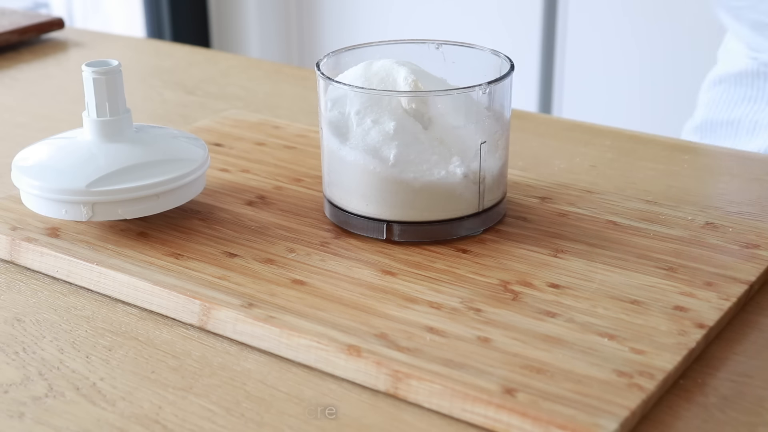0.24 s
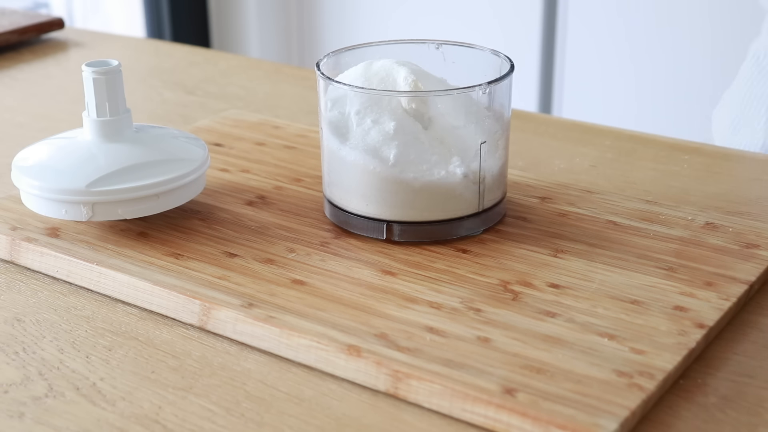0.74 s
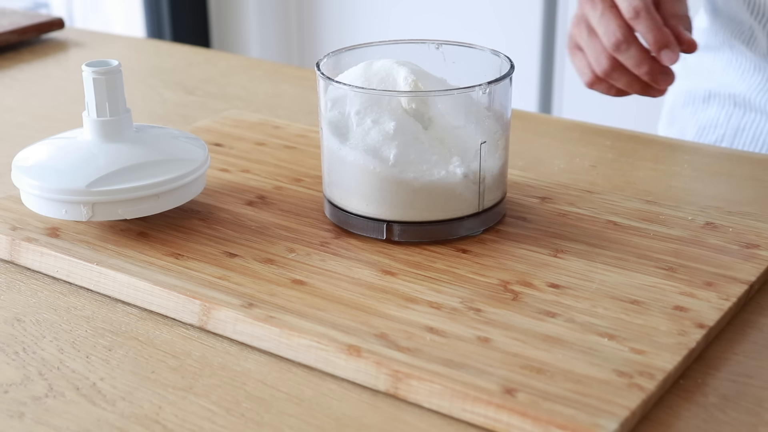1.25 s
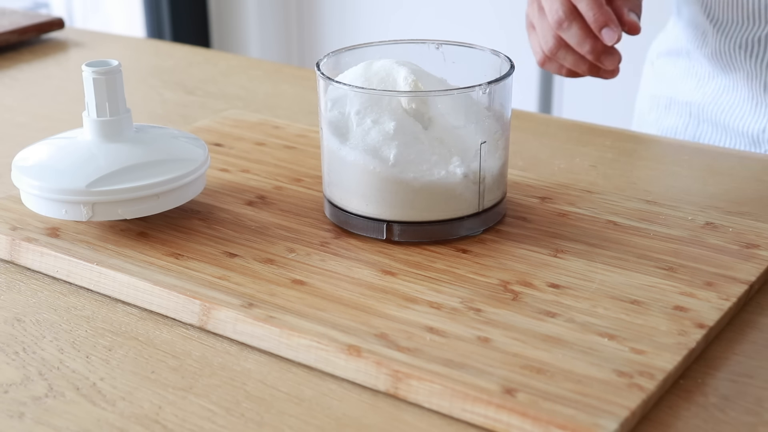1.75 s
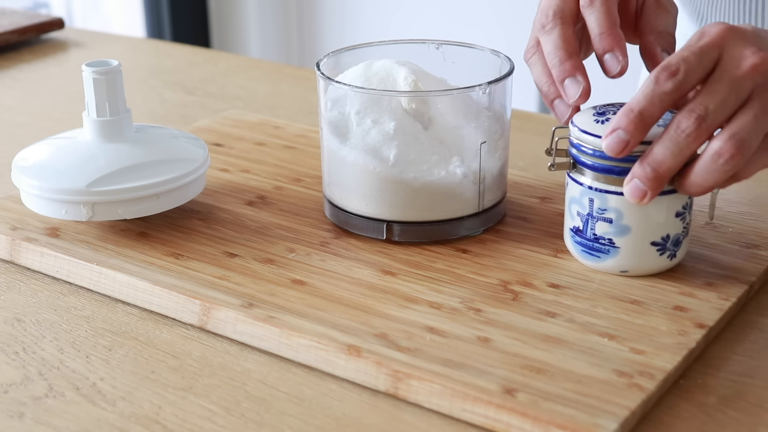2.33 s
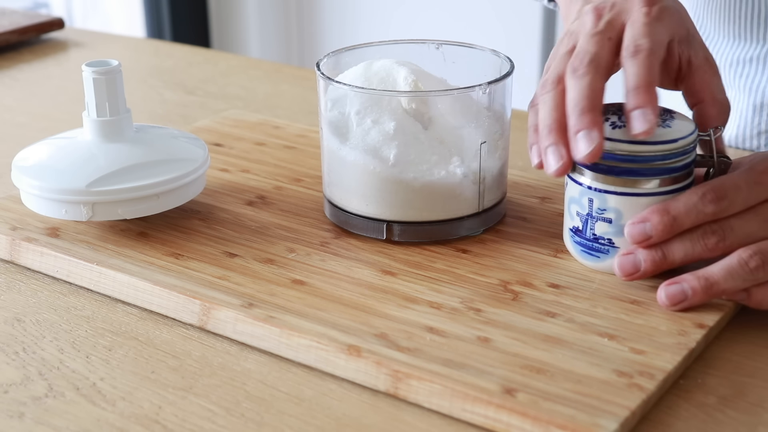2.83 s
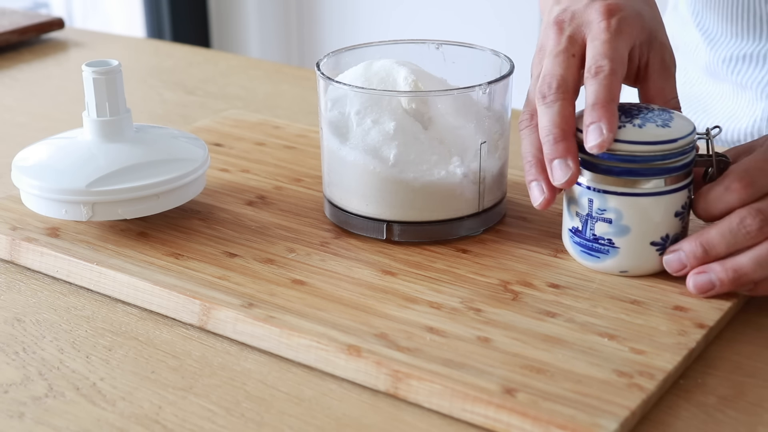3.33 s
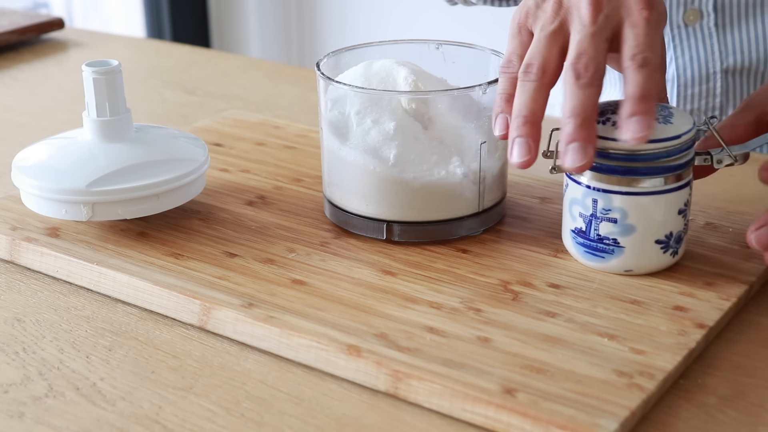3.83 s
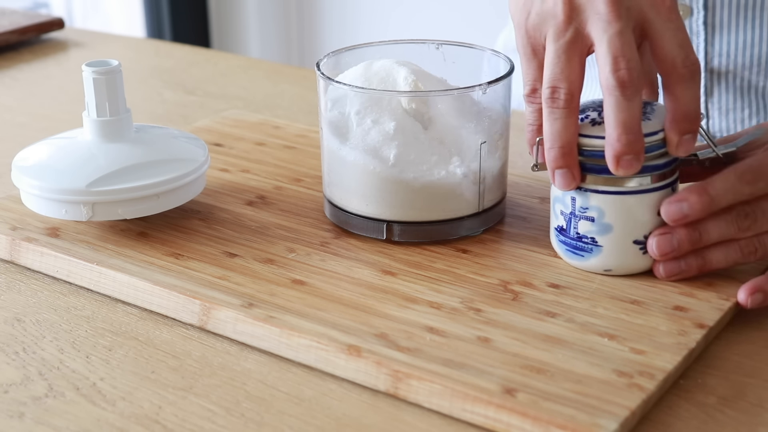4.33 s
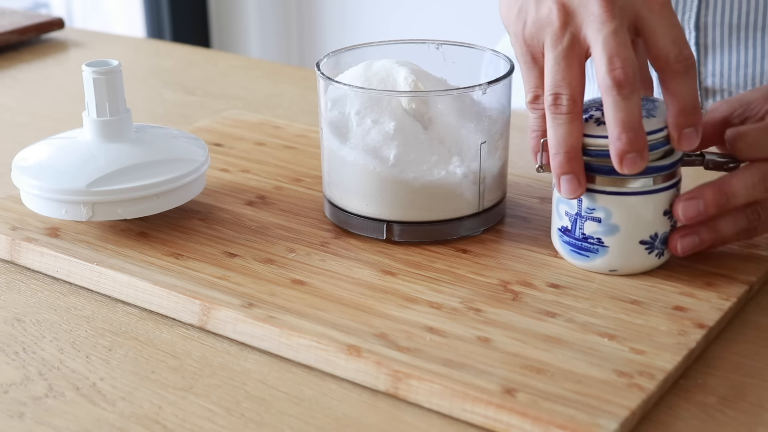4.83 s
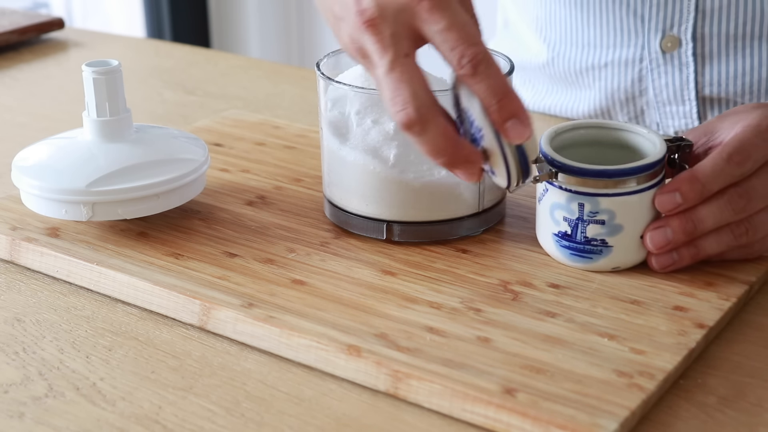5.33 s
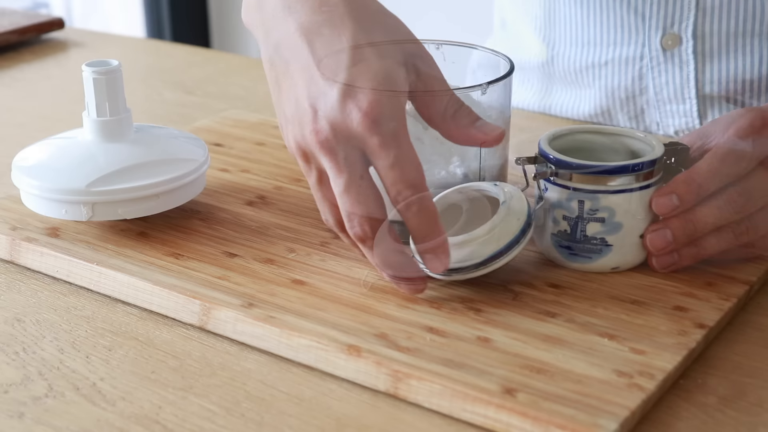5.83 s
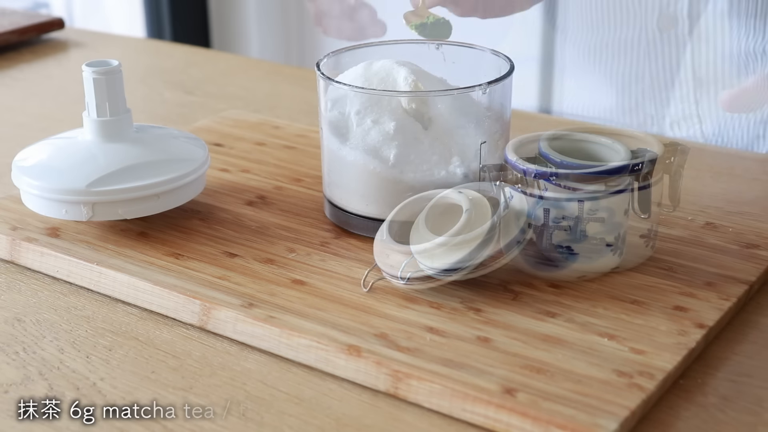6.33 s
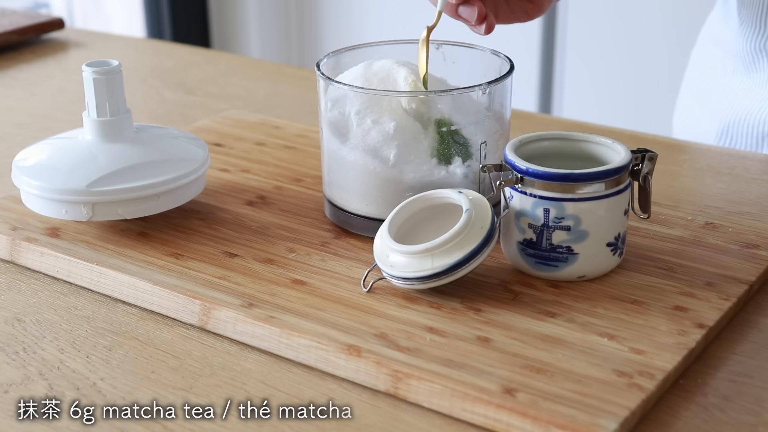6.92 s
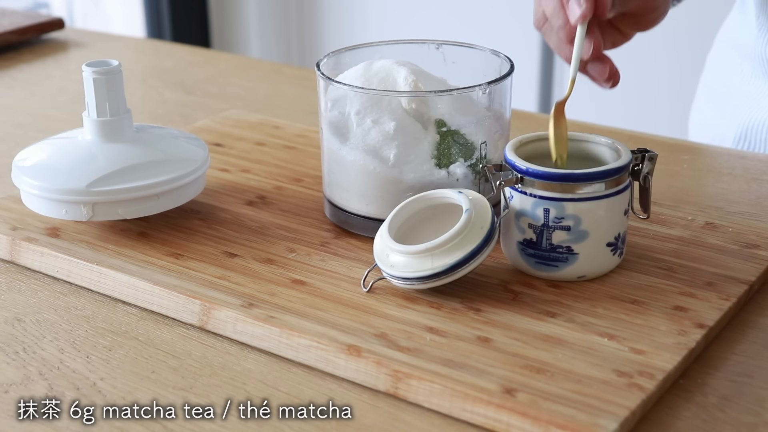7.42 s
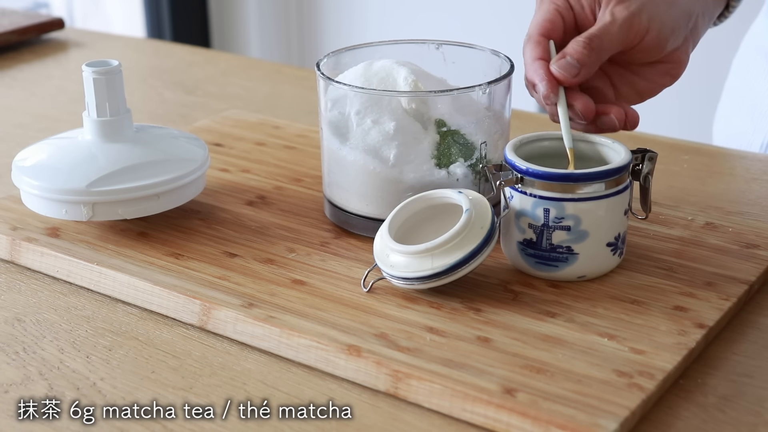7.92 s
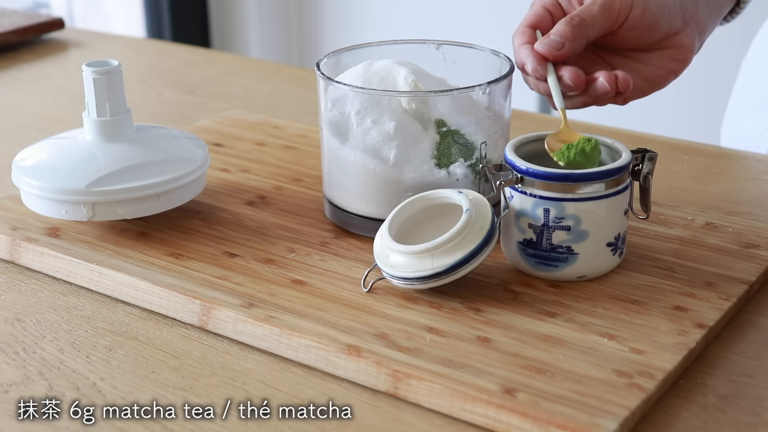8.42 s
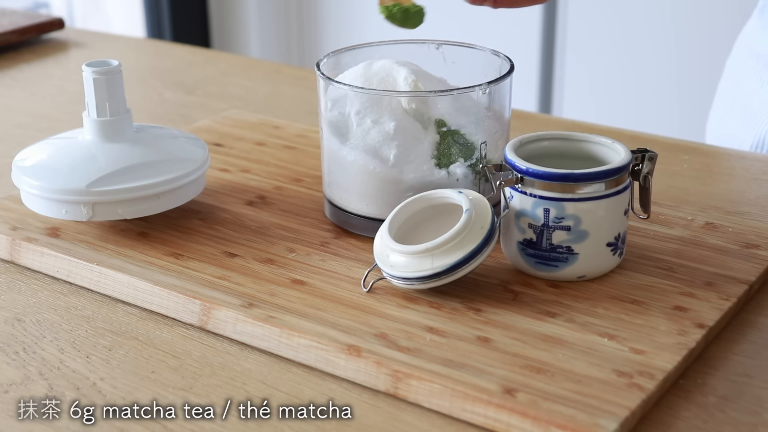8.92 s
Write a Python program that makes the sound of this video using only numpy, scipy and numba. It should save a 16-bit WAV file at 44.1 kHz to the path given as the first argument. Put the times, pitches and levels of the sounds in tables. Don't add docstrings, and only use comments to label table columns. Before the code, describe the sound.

Low house hum and soft hiss underlie kitchen handling heard close up. Two very loud, short wooden slams echo briefly, with gentle settling thumps around them. A ceramic jar's wire clasp clicks and jingles, its lid rattles open with a high bright ring, and more knocks land on the board. After a calm gap of birdsong, a spoon touches, scrapes briefly and taps the jar twice.

```python
import sys
import numpy as np
from scipy import signal
from scipy.fft import rfft, irfft
from scipy.io import wavfile
from scipy.ndimage import uniform_filter1d
from numba import njit

SR = 44100
rng = np.random.default_rng(int(sys.argv[2]) if len(sys.argv) > 2 else 0)


def invert_db(level):
    return 10 ** (np.asarray(level, dtype=float) / 20)


def materialize(psi):
    bounded = np.clip(np.atleast_2d(psi).T, -1, 1)
    quanta = np.round(bounded * 32767).astype(np.int16)
    wavfile.write(sys.argv[1], SR, quanta)


N = 403956

# pitch_hz, level_db (per Hz)
HUM = [(20, -11), (42, -5.5), (65, -7), (96, -12), (134, -2.5), (182, -14.5), (290, -14.5), (420, -18.5),
       (870, -21), (1660, -25), (2500, -27), (6000, -31.5), (11000, -37), (16000, -42.5)]
# pitch_hz, side_minus_mid_db
HUM_SIDE = [(60, -12), (110, -14), (200, -5.5), (380, -2), (700, -1), (1290, -0.5), (2380, -1.5), (4400, 0),
            (8120, -0.5), (15000, -1)]
HUM_DB = -51.5
# pitch_hz, fade_by_60_db_s, level_db
ROOM = [(99.5, 0.36, -3), (205, 0.62, -10), (400, 0.57, -13.5), (913, 0.47, -10.5), (1500, 0.47, -10),
        (2990, 0.39, -12), (5100, 0.47, -18.5), (10500, 0.082, -5.5), (15270, 0.09, -38)]
SLAM_HOLD_S = 0.065

# time_s, pitch_hz, level_db
SLUR = [(6.555, 1720, -60), (6.577, 1820, -45.5), (6.635, 1723, -47), (6.661, 2118, -44.5),
        (6.681, 2162, -39.5), (6.731, 1980, -45), (6.771, 1910, -44), (6.78, 2170, -62)]
# start_s, length_s, first_pitch_hz, last_pitch_hz, peak_db
CLEAR_NOTES = [(1.78, .075, 1895, 1865, -53), (1.9, .1, 1880, 1880, -56), (2.005, .055, 1860, 1830, -45),
               (2.065, .08, 1880, 1850, -53), (2.215, .03, 1800, 2150, -58), (7.35, .135, 1860, 1480, -48)]
STEADY_NOTES = [(7.575, .21, 2810, 2740, -51), (7.8, .09, 2780, 2750, -58), (3.095, .05, 4330, 4390, -59),
                (3.15, .12, 4390, 4390, -65), (3.41, .135, 4300, 4230, -62), (3.515, .06, 6380, 6440, -57),
                (3.58, .11, 6400, 6380, -64)]
CHIRPS = [(2.55, .035, 3250, 2950, -52), (2.56, .03, 2150, 1950, -51), (2.67, .04, 3050, 2850, -52),
          (2.68, .03, 2100, 1750, -54), (2.94, .05, 3300, 3350, -62), (6.94, .055, 2820, 2850, -51),
          (6.78, .14, 1980, 2100, -60), (6.9, .11, 2150, 2450, -55), (6.99, .22, 2450, 2480, -53),
          (7.27, .1, 1520, 1800, -54), (6.89, .12, 3100, 2700, -60), (7.48, .05, 1520, 1560, -58),
          (8.49, .1, 6250, 6750, -63), (8.55, .17, 4500, 4900, -63)]
# start_s, length_s, top_pitch_hz, peak_db, pulses_per_s
TRILLS = [(1.862, .14, 1930, -47, 29), (6.32, .182, 2120, -49, 38.5), (7.27, .09, 2020, -53, 45),
          (2.965, .12, 6550, -56, 62), (3.25, .125, 6500, -55, 62)]
# start_s, length_s, first_pitch_hz, last_pitch_hz, peak_db
SCRAPES = [
    (7.846, .016, 1150, 1150, -40),
    (7.87, .1, 1150, 950, -50),
    (7.885, .075, 3150, 2950, -51),
]
FLICK, TRILL_HUSK_HZ = .11, 25
CHIRP_HUSK, STEADY_HUSK_HZ = .19, 70
SWELL, START_DB, END_DB = .55, -11, -7
CLEAR_DB, STEADY_DB, CHIRP_DB, TRILL_DB, SCRAPE_DB = 1, -.5, -.5, 0.5, -5.5

# peak_s, half_length_s, level_db, brightness_hz
STROKES = [(.005, 0.38, -46, 940), (1.177, 0.77, -52.5, 1160), (1.542, 0.057, -49, 710),
           (3.317, 0.076, -55, 2180), (3.645, 0.95, -48, 1390), (4.08, 0.18, -46, 1570),
           (4.45, 0.9, -62, 1320), (4.715, 0.092, -54, 1500), (4.994, 0.34, -46.5, 1580),
           (7.901, 0.04, -41, 1100)]
STROKE_FADE_DB = -16

# start_s, level_db
BOOMS = [
    (2.245, -26.5),
    (5.479, -33),
    (5.867, -35),
    (7.847, -40.5),
    (8.156, -31.5),
    (8.316, -35.5),
]
# start_s, peak_db, crack_centre_hz, bright_edge_db
SETTLES = [(.535, -30, 890, -75), (.895, -42, 1210, -59), (1.16, -37.5, 1500, -70),
           (1.465, -35.5, 480, -58), (1.535, -36, 950, -29), (2.359, -31.5, 400, -60),
           (3.415, -31.5, 704, -58), (5.215, -29.5, 656, -74)]
# start_s, peak_db, crack_centre_hz, bright_edge_db
KNOCKS = [(3.694, -15, 584, -10.5), (4.297, -27.5, 760, -15), (4.695, -37, 620, -39),
          (3.698, -26, 1500, -44), (4.883, -35.5, 785, -17.5), (5.48, -14, 895, -70),
          (5.69, -41.5, 920, -31.5), (5.869, -20.5, 830, -6.5), (7.849, -31, 1030, -67),
          (8.16, -25.5, 1000, -12), (8.316, -31, 1040, -15)]
# start_s, peak_db, crack_centre_hz, bright_edge_db
SLAMS = [
    (0.415, -0.86, 1276, -8),
    (2.248, -1.8, 1520, -19),
]
# pitch_hz, level_db, fade_by_60_db_s
THUMP = [(221.7, -8, 0.033), (268, -1.5, 0.027), (324, -2.5, 0.04), (421.6, -4.5, 0.0308), (519, -2, 0.026),
         (620, -16.5, 0.026)]
KNOCK_CONTACT_S, SLAM_CONTACT_S, SETTLE_CONTACT_S = 0.0055, 0.0025, 0.028
KNOCK_THUMP_DB, SLAM_THUMP_DB, SETTLE_THUMP_DB = -11, -21, -5
THUMP_PER_EDGE = 0.14
SLAM_THUMP_PER_EDGE = -0.24

# start_s, clatter_db, wire_ring_over_clatter_db, lid_ring_over_clatter_db
CLINKS = [(3.6945, -19, -11, -12), (3.7958, -34, -21, -1.5), (3.8373, -32, -24, -15),
          (4.0183, -38.5, -14, -6), (4.049, -41, -20, -24), (4.1224, -50, -22, -20),
          (4.2969, -19, -10, -16), (4.6594, -46.5, -1, -1), (4.6943, -35.5, -7, -0.5),
          (4.7124, -29, -1, -3), (4.7322, -22.5, -21, -5.5), (4.8856, -26, -26, -12),
          (4.921, -31.5, 9.5, -26), (4.975, -40, -9, -7), (5.1862, -29, -15, -5), (5.217, -22, 17, 3),
          (5.2243, -18.5, 14, 2)]
# start_s, clatter_db, wire_ring_over_clatter_db, lid_ring_over_clatter_db
LID_DOWN = [
    (5.868, -19, -38, -38),
    (5.885, -35, -4, -25),
]
# start_s, clatter_db, wire_ring_over_clatter_db, lid_ring_over_clatter_db
LID_SHAKE = [(5.218, -24, -44, -44)]
# start_s, clatter_db
JIGGLES = [(4.03, -50), (4.065, -60), (4.115, -47), (4.145, -52), (4.64, -52), (4.95, -47), (5.01, -56),
           (5.046, -48.5), (5.07, -59)]
# start_s, clatter_db, thin_ring_over_clatter_db, bowl_ring_over_clatter_db
TAPS = [
    (7.8484, -54, -10, -18),
    (7.8986, -59, 14.5, -7),
    (8.0614, -63, -1, 12),
    (8.1579, -24, 2, -35),
    (8.316, -25, 0.5, -20),
]
WIRE_HZ = [9954, 10100, 10720, 12180, 13460, 15010, 15210]
# level_db, fade_by_60_db_s
WIRE = [(0, .28), (-11, .08), (-16, .1), (-14, .17), (-13, .05), (-18, .12), (-14, .14)]
LID_HZ = [5066, 6735, 7881, 8489, 9049]
# level_db, fade_by_60_db_s
LID = [(-7, .13), (0, .25), (3, .09), (-6, .16), (-7, .1)]
# pitch_hz, level_db, fade_by_60_db_s
JAR_WALL = [(2885, 9.5, 0.034), (3026, 3.5, 0.066), (3125, -6, 0.061), (3236, 3.5, 0.072), (3490, 0, 0.049),
            (3840, -1, 0.036), (3880, -8, 0.06)]
# pitch_hz, level_db, fade_by_60_db_s
SPOON_RING = [(7450, -3, .03), (7750, -2, .025), (8000, 0, .03), (8350, -4, .02), (8900, -4, .025)]
# pitch_hz, level_db, fade_by_60_db_s
SPOON_BOWL = [(5300, -8, 0.11), (7000, 1, .05)]
# pitch_hz, level_db, fade_by_60_db_s
SPOON_BODY = [(1696, -4, .04), (2000, -2, .04), (2250, 0, .06), (2500, -3, .04), (2724, -4, .04),
              (3144, -3, .1), (3400, -4, .04)]
CLINK_RATTLE_S, LID_RATTLE_S, SHAKE_S, TAP_RATTLE_S = .006, .007, 0.058, .013
CLINK_BODY_DB, LID_BODY_DB, TAP_BODY_DB = -2, -30, -4

LIMIT_DB, RELEASE_S = -1.5, 0.04


def shape(x, hz_points, db_points):
    hz = np.maximum(np.arange(x.shape[-1] // 2 + 1) * SR / x.shape[-1], 1)
    gain = invert_db(np.interp(np.log(hz), np.log(hz_points), db_points))
    return irfft(rfft(x) * gain, x.shape[-1])


def unit(x):
    return x / np.sqrt(np.mean(x ** 2))


def band(x, lo_hz, hi_hz):
    sos = signal.butter(2, [lo_hz, min(hi_hz, .45 * SR)], "band", fs=SR, output="sos")
    y = signal.sosfilt(sos, x)
    return y / np.abs(y).max()


def walk(rate, size=N):
    k = max(int(SR / rate), 2)
    steps = np.repeat(rng.standard_normal(size // k + 1), k)
    return 1.31 * uniform_filter1d(uniform_filter1d(steps, k), k)[:size]


def add(out, s, x):
    i = int(s * SR)
    out[i:i + len(x)] += x[:N - i]


def hum():
    hz, db = np.transpose(HUM)
    mid, side = shape(rng.standard_normal((2, N)), hz, db)
    side = shape(side, *np.transpose(HUM_SIDE))
    both = (mid + side * np.array([[1], [-1]])) / np.std(mid)
    rumble = shape(both, [150, 300], [0, -40])
    swell = invert_db(0.5 * walk(3.3)) - 1
    return invert_db(HUM_DB) * (both + rumble * swell)


def room(x, wet_db, gap_s, hold_s=0):
    t = np.arange(int(.9 * SR)) / SR
    hz, t60, db = np.transpose(ROOM)
    mid, side = rng.standard_normal((2, len(t)))
    side = shape(side, [150, 2500], [-18, 0])
    noise = rfft(shape(mid + side * np.array([[1], [-1]]), hz, db - 5))
    log_hz = np.log(np.arange(len(t) // 2 + 1) * SR / len(t) + 1)
    held_t = np.maximum(t - hold_s, 0.4 * np.minimum(t, hold_s))
    echo = 0
    for k, pick in enumerate(np.eye(len(hz))):
        part = irfft(noise * np.interp(log_hz, np.log(hz), pick), len(t))
        echo = echo + part * invert_db(-60 * held_t / t60[k])
    echo = echo * np.clip(t / gap_s, 0, 1) ** 2
    return invert_db(wet_db) * signal.fftconvolve(x[None], echo, axes=1)[:, :N]


def place(x, lag, pan_db):
    turn = np.exp(-2j * np.pi * np.arange(N // 2 + 1) * lag / N)
    left = irfft(rfft(x) * turn, N) * invert_db(pan_db / 2)
    return np.array([left, x * invert_db(-pan_db / 2)])


def glide(note, husk_hz, rate=0):
    s, hz, db = np.transpose(note)
    t = np.arange(s[0], s[-1], 1 / SR)
    pulse = (t - s[0]) * rate % 1 if rate else np.ones(len(t))
    pitch = np.interp(t, s, hz) * (1 - FLICK * (1 - pulse) ** 1.6)
    tone = np.exp(2j * np.pi * np.cumsum(pitch) / SR)
    if husk_hz:
        breath = walk(husk_hz, size=len(t)) + 1j * walk(husk_hz, size=len(t))
        tone = tone * (0.77 + 0.92 * breath)
    if rate:
        tone = tone * np.sin(np.pi * pulse) ** 0.26
    fade = np.clip(np.minimum(t - s[0], s[-1] - t) / 0.001, 0, 1)
    return invert_db(np.interp(t, s, db) + 4) * fade * tone.real


def arch(s, length_s, first_hz, last_hz, db, gain_db):
    db = db + gain_db
    peak_hz = first_hz + SWELL * (last_hz - first_hz)
    return [(s, first_hz, db + START_DB), (s + SWELL * length_s, peak_hz, db),
            (s + length_s, last_hz, db + END_DB)]


def birds():
    song = np.zeros(N)
    add(song, SLUR[0][0], glide(SLUR, 0))
    for note in CLEAR_NOTES:
        add(song, note[0], glide(arch(*note, CLEAR_DB), 0))
    for note in STEADY_NOTES:
        add(song, note[0], glide(arch(*note, STEADY_DB), STEADY_HUSK_HZ))
    for note in CHIRPS:
        add(song, note[0], glide(arch(*note, CHIRP_DB), CHIRP_HUSK * note[2]))
    for s, length_s, hz, db, rate in TRILLS:
        note = arch(s, length_s, .96 * hz, hz, db, TRILL_DB)
        add(song, s, glide(note, TRILL_HUSK_HZ * (hz / 2000) ** 3, rate))
    return song


def spoon_scrape():
    scrape = np.zeros(N)
    for note in SCRAPES:
        add(scrape, note[0], glide(arch(*note, SCRAPE_DB), 450))
    return scrape


def rub():
    t = np.arange(N) / SR
    grains = rng.standard_normal(N) * invert_db(2 * walk(60))
    dull = unit(band(grains, 89.3, 1390))
    bright = unit(band(grains, 1040, 3450))
    out = 0
    for s, half_s, db, hz in STROKES:
        share = np.clip(hz / 4000, 0, 1)
        level = invert_db(db + STROKE_FADE_DB * np.abs(t - s) / half_s)
        out = out + level * ((1 - share) * dull + share * bright)
    return out


def ring(modes, rise_s, scatter_db, rough):
    t = np.arange(SR // 2) / SR
    hz, db, t60 = np.transpose(modes)[:, :, None]
    db = db + scatter_db * rng.standard_normal(db.shape)
    flutter = 1 + rough * np.array([walk(262, size=len(t)) for _ in modes])
    y = np.sum(flutter * invert_db(db - 60 * t / t60) * np.sin(2 * np.pi * hz * t), axis=0)
    y = y * (1 - np.exp(-t / max(rise_s, 1 / SR)))
    return y / np.abs(y).max()


def burst(length_s):
    t = np.arange(SR // 5) / SR
    x = rng.standard_normal(len(t)) * np.exp(-t / max(length_s, 1 / SR))
    x[0] = 3.15
    return x


def strike(dry, echo, s, db, length_s, lo_hz, hi_hz):
    chatter = burst(length_s)
    add(dry, s, invert_db(db) * band(chatter, lo_hz, hi_hz))
    click = np.eye(1, len(chatter))[0]
    even = band(click, lo_hz, hi_hz)
    add(echo, s, invert_db(db) * even * np.std(band(chatter, lo_hz, hi_hz)) / np.std(even))


def table():
    out = np.zeros(N)
    for s, db in BOOMS:
        add(out, s, invert_db(db) * ring([(164.0, -1, 0.75), (133.3, -7, 0.45)], 0.007, scatter_db=2, rough=0.38))
    return out


def board(blows, contact_s, thump_db, low_share, high_share, edge_echo_db, per_edge=THUMP_PER_EDGE):
    dry, echo, edge, edge_echo, low = np.zeros((5, N))
    for s, crack_db, hz, edge_db in blows:
        strike(dry, echo, s, crack_db + 3, contact_s, low_share * hz, high_share * hz)
        strike(edge, edge_echo, s, edge_db - 3.5, 0.074 * contact_s, 1640, 6000)
        level_db = crack_db + thump_db + per_edge * (edge_db - crack_db) + 10
        add(low, s, invert_db(level_db) * ring(THUMP, 0.0011, scatter_db=6.5, rough=0.74))
    low = shape(low, [70, 150], [-25, 0])
    return dry + edge + low, echo + invert_db(edge_echo_db) * edge_echo + low


def clinks(blows, rattle_s, body_db, thin, mid, body, low_hz, top_hz, thin_rough=0.54):
    dry, echo, rings = np.zeros((3, N))
    for s, clatter_db, thin_db, mid_db in blows:
        parts = ((thin, thin_db - 4.0, thin_rough, 1.5),
                 (mid, mid_db - 0.5, .6, 2.5),
                 (body, body_db, 1.2, 3.5))
        for modes, db, rough, scatter_db in parts:
            add(rings, s, invert_db(clatter_db + db) * ring(modes, 0.027 * rattle_s, scatter_db, rough))
        strike(dry, echo, s, clatter_db, rattle_s, low_hz, top_hz)
    return dry + rings, echo + rings / 2.5


def scene():
    song, scrape, hands = birds(), spoon_scrape(), rub()
    soft, soft_echo = board(SETTLES, SETTLE_CONTACT_S, SETTLE_THUMP_DB, 0.32, 1.57, -9)
    wood, wood_echo = board(KNOCKS, KNOCK_CONTACT_S, KNOCK_THUMP_DB, 0.75, 1.3, 0.85)
    slam, slam_echo = board(SLAMS, SLAM_CONTACT_S, SLAM_THUMP_DB, 0.6, 1.436, -29, SLAM_THUMP_PER_EDGE)

    jar_parts = np.c_[WIRE_HZ, WIRE], np.c_[LID_HZ, LID], JAR_WALL
    spoon_parts = SPOON_RING, SPOON_BOWL, SPOON_BODY
    wire_hits = [(s, db, -15, -15) for s, db in JIGGLES]
    jiggle, jiggle_echo = clinks(wire_hits, 0.0061, 7, *jar_parts, 3200, 4500)
    shake, shake_echo = clinks(LID_SHAKE, SHAKE_S, -21, *jar_parts, 3200, 15000)
    down, down_echo = clinks(LID_DOWN, LID_RATTLE_S, LID_BODY_DB, *jar_parts, 3600, 5400)
    spoon, spoon_echo = clinks(TAPS, TAP_RATTLE_S, TAP_BODY_DB, *spoon_parts, 1480, 2930, thin_rough=1.0)
    jar, jar_echo = clinks(CLINKS, CLINK_RATTLE_S, CLINK_BODY_DB, *jar_parts, 7750, 14000)

    direct = place(song, 0.25, 0.37) + place(hands, 1.6, 0.67)
    direct = direct + place(slam + wood + soft / 4 + table(), 2.08, 1.0)
    direct = direct + place(spoon + scrape + down, 0.63, -0.33)
    direct = direct + place(jar + shake + jiggle, 2.1, -5)

    slam_echo = shape(slam_echo, [200, 350, 700, 1500, 2600, 4300, 5170], [1, 4, 7, 0.5, 0.5, -2.0, -15.5])
    wet = room(song, -23, 0.012)
    wet = wet + room(wood_echo + soft_echo + hands + down_echo, -17, 0.003)
    wet = wet + room(slam_echo, -22.5, 0.0037, SLAM_HOLD_S)
    wet = wet + room(spoon_echo + scrape, -13.0, 0.0035)
    wet = wet + room(jar_echo + shake_echo + jiggle_echo, -11.0, 0.0044)
    return hum() + direct + wet


@njit
def follow(x, attack, release):
    e, out = 0., np.empty(len(x))
    for i in range(len(x)):
        e += (x[i] - e) * (attack if x[i] > e else release)
        out[i] = e
    return out


def low_pass(x):
    return signal.sosfilt(signal.butter(12, 16670, fs=SR, output="sos"), x)


def record(dry):
    peak = np.abs(dry).max(axis=0)
    quick = follow(peak, 1 / (0.0046 * SR), 1 / (RELEASE_S * SR))
    slow = follow(peak, 1 / (0.016 * SR), 1 / (.25 * SR))
    quick_gain = np.minimum(1, invert_db(LIMIT_DB) / (quick + 1e-9)) ** 0.2
    slow_gain = np.minimum(1, invert_db(-24.0) / (slow + 1e-9)) ** 0.024
    clipped = np.clip(dry * quick_gain * slow_gain, -1, 1)
    mix = shape(clipped, [15500, 16600], [0, -40])
    return low_pass(mix)


dry = scene()
out = record(dry)
materialize(out)
```